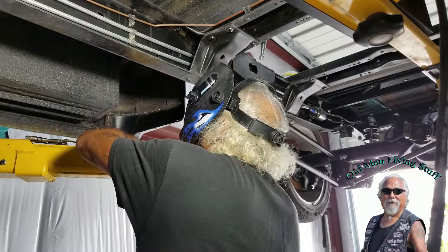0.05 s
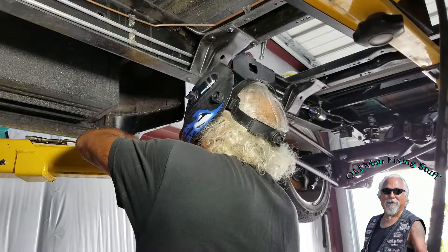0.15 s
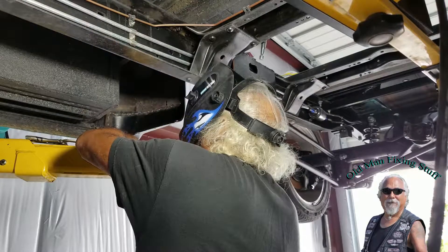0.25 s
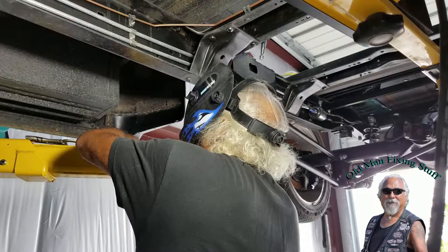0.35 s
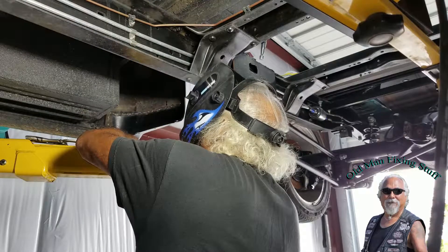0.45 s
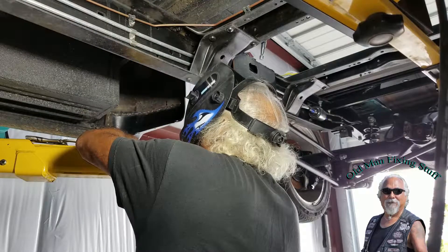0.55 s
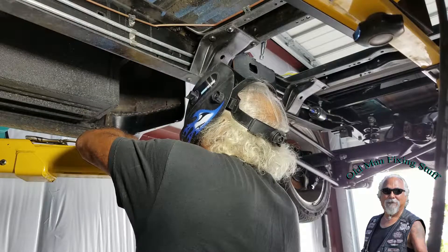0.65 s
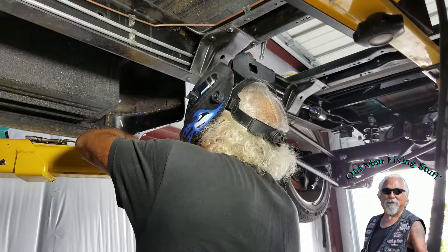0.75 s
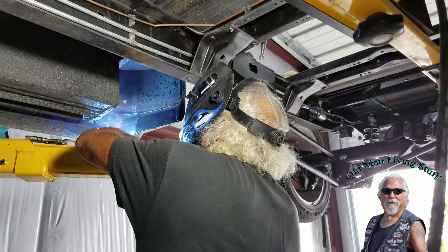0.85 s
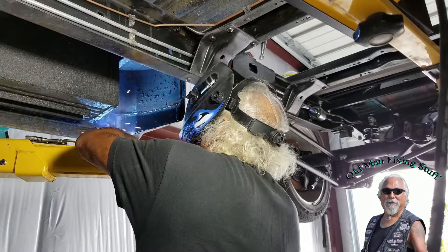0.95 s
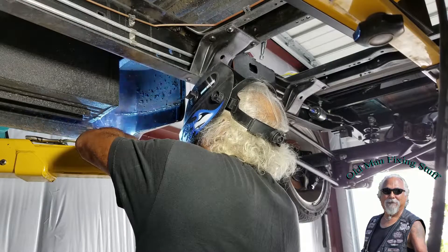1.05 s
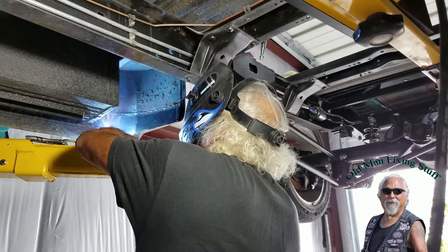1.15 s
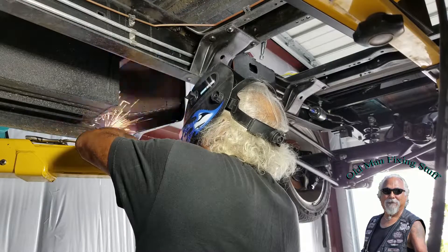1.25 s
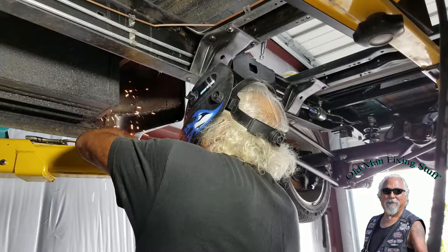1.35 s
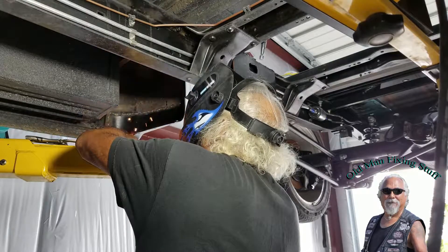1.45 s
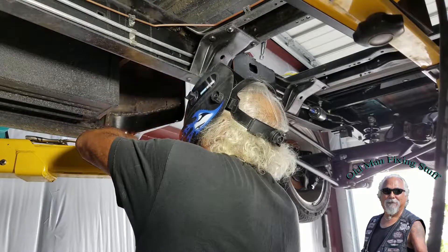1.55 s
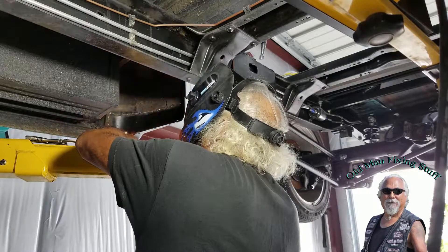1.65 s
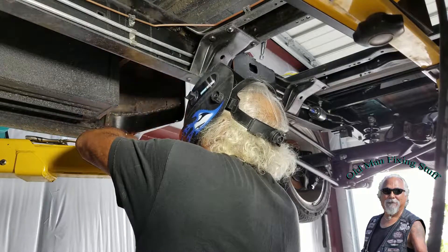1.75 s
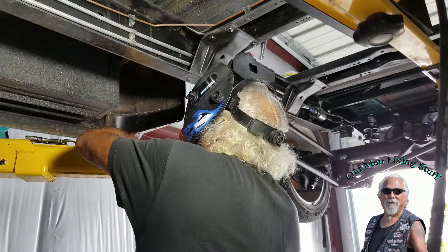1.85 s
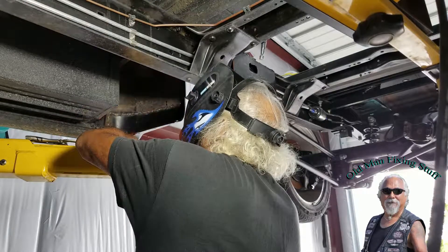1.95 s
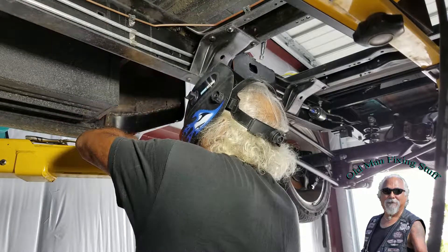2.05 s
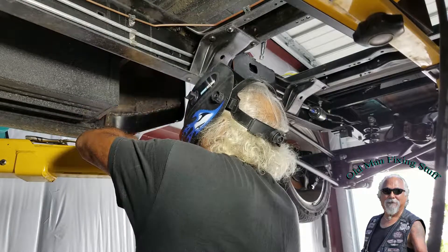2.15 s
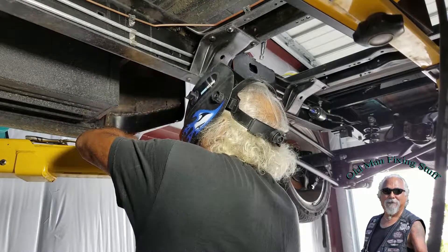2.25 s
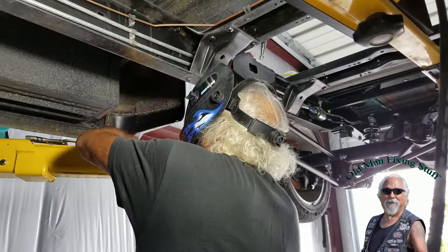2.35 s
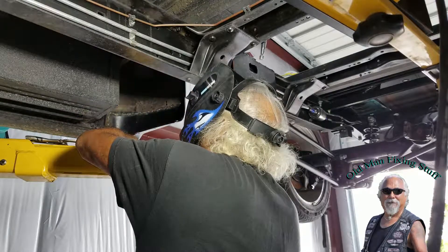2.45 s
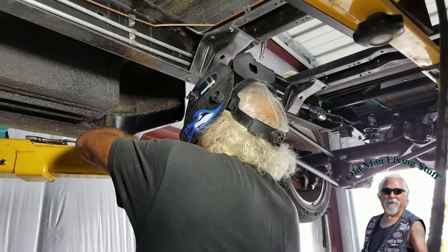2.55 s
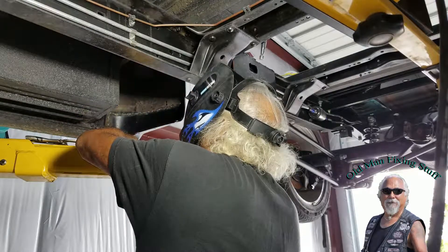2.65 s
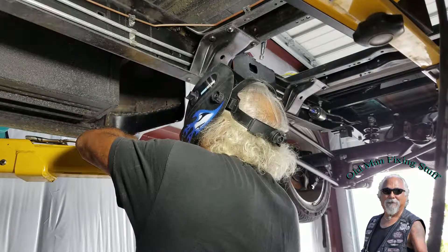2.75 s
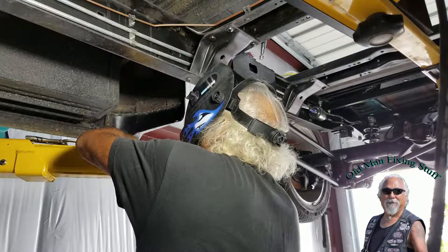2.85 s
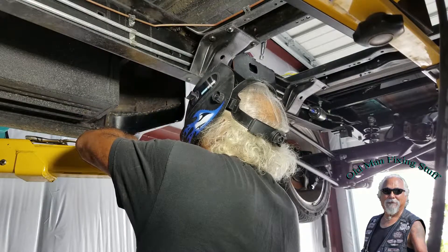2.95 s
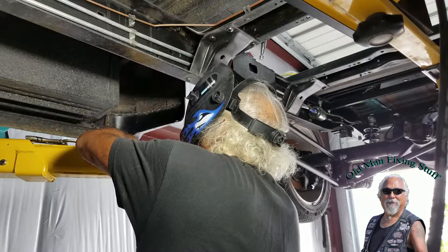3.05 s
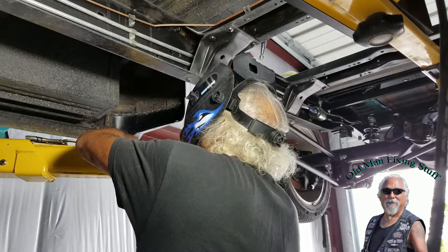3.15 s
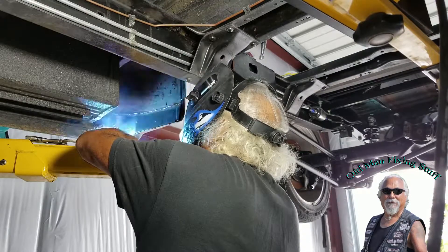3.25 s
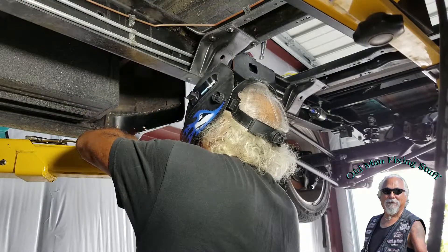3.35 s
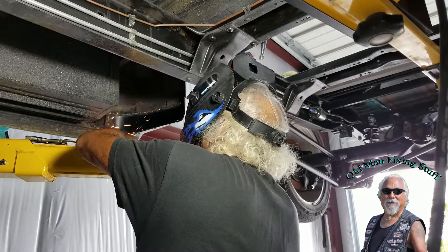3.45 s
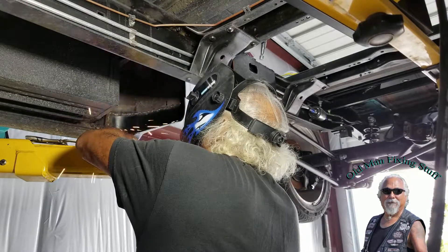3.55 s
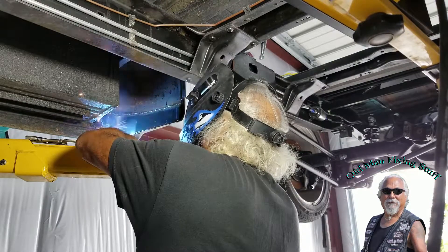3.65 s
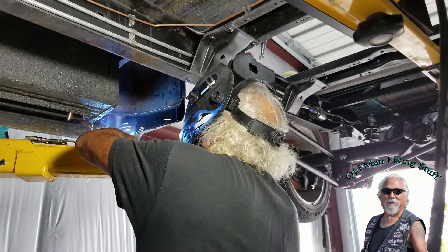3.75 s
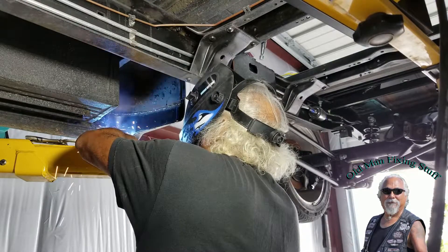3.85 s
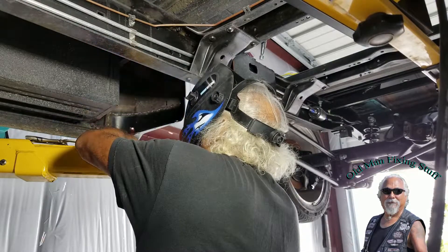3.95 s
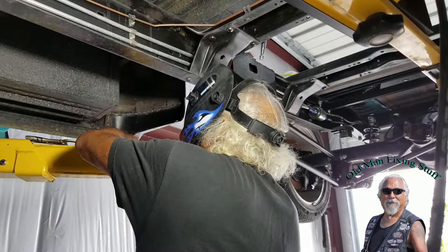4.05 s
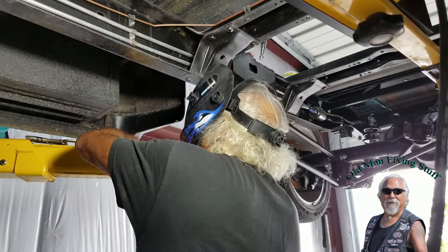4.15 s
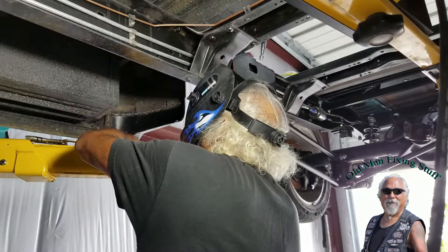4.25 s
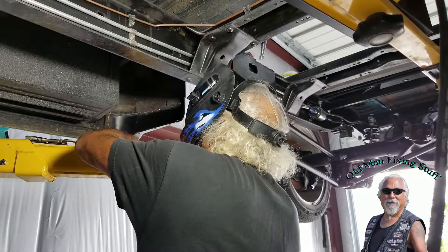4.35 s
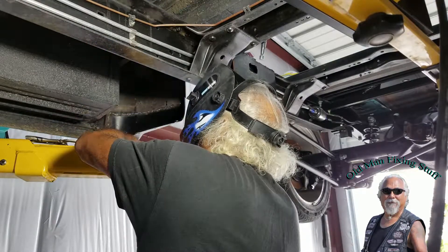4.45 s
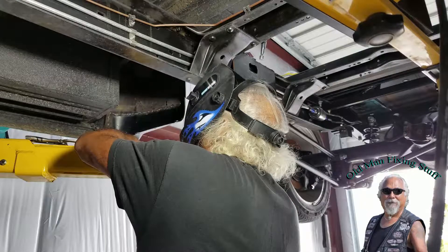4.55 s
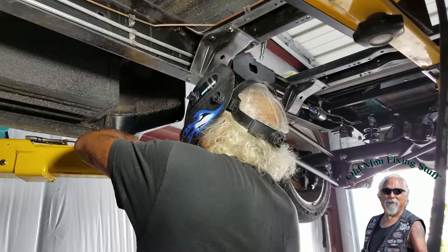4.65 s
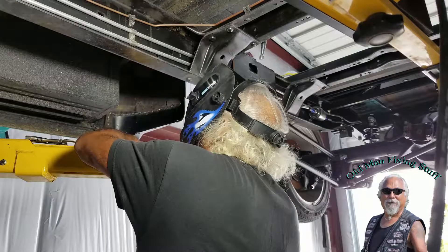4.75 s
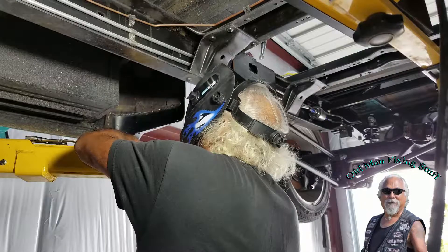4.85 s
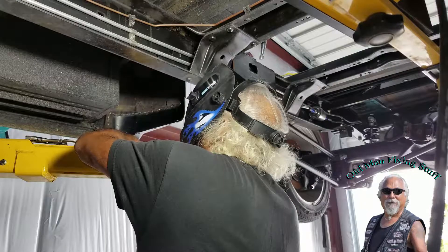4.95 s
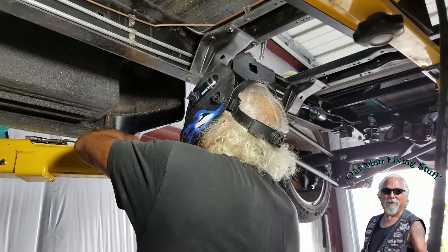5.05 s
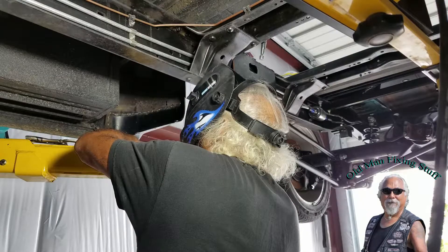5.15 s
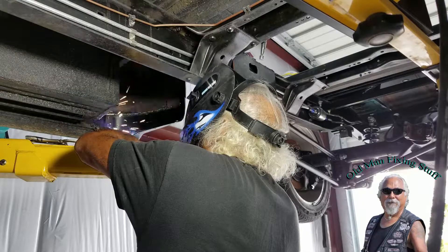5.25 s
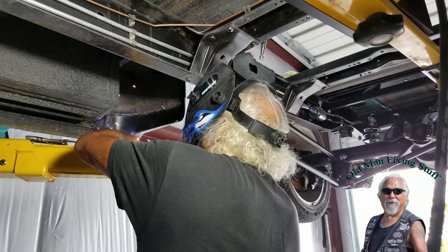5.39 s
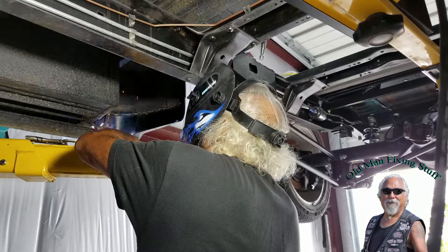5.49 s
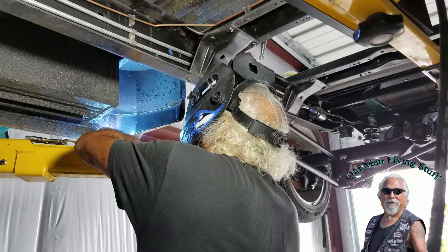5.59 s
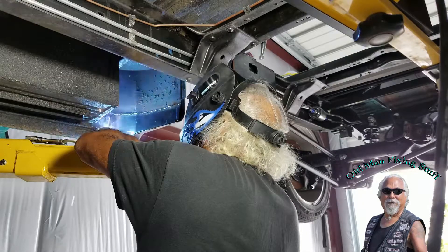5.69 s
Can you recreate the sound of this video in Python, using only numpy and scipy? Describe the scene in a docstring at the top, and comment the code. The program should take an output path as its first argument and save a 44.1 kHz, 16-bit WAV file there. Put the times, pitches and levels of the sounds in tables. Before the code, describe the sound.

In a workshop, beneath a raised car, a welding machine's cooling fan runs quietly: rushing air with a wavering midrange hum that rises and falls in level. At about 0.55 s a relay clicks; from 0.65 s sharp, irregular arc pops and a hissing spray of metal burst out, followed by a dense crackle of roughly 65 snaps a second from 1.0 to 1.2 s, and two last pops. A very faint click follows at 1.7 s, then only the fan. The second weld sputters from 3.2 s with loud snaps and crackles steadily from 3.7 to 3.85 s; a light touch and a dull panel bump follow at 3.9 s. A faint click comes at 4.35 s, a clearer one at 5.1 s. The third weld snaps hard at 5.2 s, stutters, and ends in two tiny crackles around 5.6 and 5.7 s. The close, bright snaps ring in the car's hollow and the room.

```python
"""First a welding machine's fan hums, then a relay clicks and a wire-feed welder starts under a car, in a workshop.
Three short tack welds stutter, then crackle: each short circuit of the wire is a spike with a brief noise sizzle.
Noise volleys make the metal sprays; the car's hollow and the room ring with the arc.
Relay clicks (shaped noise) come before or after a weld; a light touch and a bump ring a panel (fading sines).
The fan is coloured noise for its air and wavering sines for its hum; this background is heard louder and softer."""
import sys
import numpy as np
from scipy import signal
from scipy.fft import rfft, irfft
from scipy.io import wavfile
from scipy.ndimage import uniform_filter1d

SR = 44100
rng = np.random.default_rng(int(sys.argv[2]) if len(sys.argv) > 2 else 0)


def put_to_file(sound):
    """Save the sound as 16-bit audio at rate SR, in the file named by the first command-line argument."""
    columns = np.atleast_2d(sound).T  # one column per channel
    safe = np.clip(columns, -1, 1)
    whole_steps = np.round(safe * 32767)
    wavfile.write(sys.argv[1], SR, whole_steps.astype(np.int16))


N = 252252
TIME = np.arange(N) / SR

# Levels in the tables are relative: later gains and filters act on them too.
# single loud pops of the arc: (t/s, level/dB, brightness/dB per octave)
SNAPS = [(0.6579, 0, 0), (0.768, 0, 0.8), (0.8314, -8.5, 1.2), (0.839, -8.5, -2.5), (0.8804, -4.5, 0),
         (0.9089, -5.5, 0.3), (0.9465, -9.5, 0.7), (1.2403, -5, 2.3), (1.256, -9, 1.3), (3.2278, -3, -1),
         (3.391, -0.5, 0), (3.401, -1.5, -1.5), (3.4909, 2.5, -0.5), (3.566, 1.5, -0.2),
         (3.6393, -3.5, 0.1), (3.6578, 1.5, -1.3), (5.1946, -22, -1), (5.2136, 1.5, 1),
         (5.3088, -0.5, -0.1), (5.446, -6.5, -0.1)]
# stretches where the arc holds and crackles:
# (start t/s, end t/s, short circuits per s, opening level/dB, opening brightness/dB per octave)
CRACKLES = [(1.0107, 1.2203, 66, -8.7, -1.26), (3.6898, 3.839, 60, -5.5, -1.0),
            (5.5806, 5.632, 59, -7.5, -1), (5.675, 5.7124, 60, -13.5, -0.5)]
# sprays of molten metal when the wire burns back: (t/s, level/dB, brightness/dB per octave)
SPRAYS = [(0.657, -18, 1.5), (0.769, -27, .7), (3.224, -22, -2), (3.388, -28, -3), (3.491, -22, -1),
          (3.566, -22.5, -2), (5.213, -15.5, 1), (5.307, -30, 1.5)]
# colour of the whole arc: (f/Hz, level/dB)
ARC_COLOUR = [(25, -30), (70, -13), (150, 2.5), (650, -2.5), (1100, -2), (1850, 3), (2700, 3.5), (4200, 7),
              (6500, 3), (9000, 7.5), (12000, 2), (15500, -4)]
# colour of the metal sprays: (f/Hz, level/dB)
SPRAY_COLOUR = [(30, 12), (100, -1), (280, -4.5), (480, 0), (800, -2), (1500, -3.5), (3700, -5),
                (6200, 3.5), (9000, -6), (16000, -12)]
# air resonances of the hollow around the arc: (f/Hz, width/Hz, level/dB)
HOLLOW = [(287, 240, 10), (883, 310, 9.5), (1133, 365, 8.5), (1315, 60, 7.5), (1537, 130, 7),
          (2290, 300, 6), (3280, 390, 3), (3560, 364, 11.5), (4010, 270, 3), (4695, 130, 8),
          (4920, 76, -2.5), (5610, 160, 5.5), (7250, 97, 11.5), (7505, 72, 9.5), (8740, 133, 11.5),
          (9400, 410, 5), (10180, 110, -4)]
# echoes off the nearest panels and the floor, flipped where they turn at an open edge: (delay/ms, gain)
ECHOES = [(.32, -0.29), (1.11, -0.18), (2.15, 0.13), (2.7, 0.39), (15.1, -0.1)]
# relay clicks: (t/s, level/dB, brightness/dB per octave)
RELAY = [(0.558, -28, 0), (1.690, -45, -5), (4.361, -38.5, -5), (5.109, -27, 0.5)]
# colour of the relay clicks: (f/Hz, level/dB)
CLICK_COLOUR = [(100, -23.5), (700, -14.5), (1400, 7), (1900, 3), (2800, -1.5), (4500, -0.5), (8000, -5),
                (16000, -29)]
# a light touch, then a dull bump on the car body: (t/s, level/dB)
BUMPS = [(3.892, -37), (3.943, -25)]
# what the bumped panel rings with: (f/Hz, time to fall 60 dB/s, level/dB)
PANEL = [(178, 0.12, -29), (347, 0.35, -11), (421, 0.052, 1), (460, 0.084, -7.5), (562, 0.22, -9.5),
         (642, 0.26, -16), (1240, 0.084, -13.5), (1530, .13, -22)]
# colour of the rattle after a bump: (f/Hz, level/dB)
RATTLE_COLOUR = [(60, -10), (150, -5), (500, 0), (850, -17), (1600, -12), (4000, -35), (10000, -50)]
# colour of the fan's rushing air: (f/Hz, level/dB)
FAN_AIR_COLOUR = [(30, -21.5), (70, -10), (160, -0.5), (230, 1), (430, 1.2), (650, -2.5), (860, -9),
                  (1040, -5), (1400, -10), (2600, -15.5), (4200, -15), (7000, -27.5), (10000, -39),
                  (16000, -60.5)]
# tones of the machine: (f/Hz, level/dB, waver/Hz)
HUM = [(222.4, -10, 9), (501.9, -3, 0.74), (668.5, -11.5, 7), (1026, -13.5, 9), (1720, -18.5, 8)]
# background level as heard: it dips after each weld and slowly recovers: (t/s, level/dB)
BACKGROUND_LEVEL = [(0.15, -49.5), (0.68, -39.5), (1.0, -48.5), (1.5, -51.5), (2.33, -46.5), (2.6, -40.5),
                    (3.34, -39.5), (4.1, -44), (4.72, -45.5), (5.07, -41), (5.55, -48)]
# workshop reverberation: (f/Hz, time to fall 60 dB/s, level/dB)
ROOM = [(125, 0.7, -11.5), (500, 0.65, -3.5), (2000, 0.22, 1.5), (3940, 0.88, -10.5), (6500, 0.51, -3),
        (10100, 0.46, -13.5), (15000, 0.25, -19)]

# random spread in a crackle: timing (share of a gap), level (dB), brightness (dB per octave)
CRACKLE_JITTER, CRACKLE_SCATTER_DB, CRACKLE_SCATTER_TILT = 0.14, 1.16, 0.9
# the snaps soften and thin out as the pool heats (dB per s, dB per octave per s)
SETTLE_DB_PER_S, THIN_TILT_PER_S = -7.5, 7
# snaps crowd together midway: their largest shift in time, as a share of the stretch
MIDWAY_HURRY = 0.03
# how long a spray of 0 dB holds; weaker ones are shorter in proportion
SPRAY_HOLD_S = 0.07
TOP_HZ = 16100  # nothing much is heard above this


def undb(db):
    """Decibels to gain."""
    return 10 ** (np.asarray(db) / 20)


def log_interp(hz, points, values):
    """Straight lines on a log-frequency axis."""
    return np.interp(np.log(np.maximum(hz, 1)), np.log(points), values)


def colour(x, spectrum, size=2048):
    """Filter with the given (Hz, dB) points, reacting as early as it can (minimum phase)."""
    bins = np.fft.rfftfreq(size, 1 / SR)
    level_db = log_interp(bins, *np.transpose(spectrum))
    # folding the cepstrum forward in time keeps the filter from ringing ahead of the sound
    cepstrum = irfft(np.log(undb(level_db)))
    cepstrum[1:size // 2] *= 2
    cepstrum[size // 2 + 1:] = 0
    response = irfft(np.exp(rfft(cepstrum)))
    return signal.fftconvolve(x, response)[:len(x)]


def tilt(x, db_per_octave, low_hz=600, high_hz=12000):
    """Brighten or dull a sound about the middle of its range."""
    db = db_per_octave * np.log2(high_hz / low_hz) / 2
    return colour(x, [(low_hz, -db), (high_hz, db)])


def unit(x):
    """Scale to rms 1."""
    return x / np.sqrt(np.mean(x ** 2))


def fade(t, t60):
    """Exponential decay by 60 dB in t60 seconds."""
    return np.exp(-np.log(1000) * t / t60)


def walk(rate):
    """Smooth random wander of rms near 1, with about `rate` new values per second."""
    k = int(SR / rate)
    steps = np.repeat(rng.standard_normal(N // k + 1), k)
    smooth = uniform_filter1d(uniform_filter1d(steps, k), k)
    return unit(smooth[:N])


def add(out, s, x):
    """Mix x in at time s."""
    part = out[int(round(s * SR)):][:len(x)]
    part += x[:len(part)]


def snaps(sizzle_db=-8, sizzle_t60=0.025, size=4096):
    """Each short circuit bursts the wire's tip: one pressure spike and a brief sizzle as the arc relights."""
    out, t = np.zeros(N), TIME[:size]
    for s, db, brightness in [*SNAPS, *crackle()]:
        sizzle = rng.standard_normal(size) * fade(t, sizzle_t60)
        sizzle = undb(sizzle_db) * sizzle / np.linalg.norm(sizzle)
        snap = sizzle - signal.unit_impulse(size)
        add(out, s, undb(db) * tilt(snap, brightness))
    return out


def crackle():
    """The feeding wire dips into the pool at a loose rate; one (s, dB, brightness) per short circuit."""
    for start, end, rate, db, brightness in CRACKLES:
        length = end - start
        chance = rng.standard_normal((32, 3))
        gaps = max(round(length * rate), 1)
        for k, (late, louder, brighter) in enumerate(chance[:gaps + 1]):
            jitter = (0 < k < gaps) * CRACKLE_JITTER * late  # the first and last stay put
            share = (k + jitter) / gaps
            age = length * (share + MIDWAY_HURRY * np.sin(2 * np.pi * share))
            level_db = db + SETTLE_DB_PER_S * age + CRACKLE_SCATTER_DB * louder
            snap_tilt = brightness + THIN_TILT_PER_S * age + CRACKLE_SCATTER_TILT * brighter
            yield start + age, level_db, snap_tilt


def sprays(grain_db=2.5, t60=0.17, size=8192):
    """Droplets burst in a dense volley that holds briefly and dies away."""
    out, t = np.zeros(N), TIME[:size]
    for s, db, brightness in SPRAYS:
        hold_s = SPRAY_HOLD_S * undb(db)
        grain = undb(grain_db * rng.exponential(size=size))  # a few samples stand out
        bursts = unit(rng.standard_normal(size) * grain)
        envelope = fade(np.maximum(t - hold_s, 0), t60)
        add(out, s, undb(db) * tilt(bursts, brightness) * envelope)
    return colour(out, SPRAY_COLOUR)


def hollow(x, scatter_db=-1.0, scatter_t60=0.072, build_s=0.0012, size=4096):
    """The car's underside: panel echoes coloured by its air resonances, plus scatter off the parts around."""
    t = TIME[:size]
    echoes = signal.unit_impulse(size)  # the direct sound
    for ms, gain in ECHOES:
        echoes[int(ms * SR / 1000)] += gain
    bins = np.fft.rfftfreq(size, 1 / SR)[1:]
    resonance_db = sum(db / (1 + (2 * (bins - hz) / width) ** 2) for hz, width, db in HOLLOW)
    scatter = rng.standard_normal(size) * fade(t, scatter_t60) * (1 - np.exp(-t / build_s))
    scatter = undb(scatter_db) * scatter / np.linalg.norm(scatter)
    response = colour(echoes, np.column_stack([bins, resonance_db])) + scatter
    return signal.fftconvolve(x, response)[:N]


def ribs(x, bounce=0.9):
    """Ribs and seams smear a spike over a few ms without colouring it: two all-passes."""
    g = np.clip(bounce, 0, 0.95)
    for lag in (6, 17):  # samples
        delayed = signal.unit_impulse(lag + 1, lag)
        direct = signal.unit_impulse(lag + 1)
        x = signal.lfilter(g * direct + delayed, direct + g * delayed, x)
    return x


def relay(chatter_s=0.0045, t60=0.16, size=8192):
    """The contacts chatter and rattle the machine's case: noise that holds briefly, then fades."""
    out, t = np.zeros(N), TIME[:size]
    for s, db, brightness in RELAY:
        rattle = rng.standard_normal(size) * fade(np.maximum(t - chatter_s, 0), t60)
        add(out, s, undb(db) * tilt(rattle, brightness))
    return colour(out, CLICK_COLOUR)


def bumps(rattle_db=-10, rattle_t60=0.24, low_hz=140, size=16384):
    """A soft blow rings the panel's own tones, with a dull rattle."""
    out, t = np.zeros(N), TIME[:size]
    ring = sum(undb(db) * fade(t, t60) * np.sin(2 * np.pi * hz * t) for hz, t60, db in PANEL)
    for s, db in BUMPS:
        rattle = unit(colour(rng.standard_normal(size), RATTLE_COLOUR)) * fade(t, rattle_t60)
        add(out, s, undb(db) * (ring + undb(rattle_db) * rattle))
    # a thin panel radiates little bass
    return signal.sosfilt(signal.butter(2, low_hz, "highpass", fs=SR, output="sos"), out)


def workshop(x):
    """Diffuse room tail: noise in overlapping bands, each fading at its own speed."""
    t = TIME[:SR]
    hz, t60, level_db = np.transpose(ROOM)
    noise, bins = rfft(rng.standard_normal(SR)), np.fft.rfftfreq(SR, 1 / SR)
    tail = np.zeros(SR)
    for share, decay, db in zip(np.eye(len(hz)), t60, level_db):
        band = irfft(noise * log_interp(bins, hz, share))
        evened = np.sqrt(decay * SR / (2 * np.log(1000)))  # so a long fade adds no energy
        tail += band * undb(db) * fade(t, decay) / evened
    build_up = 1 - np.exp(-t / 0.016)
    return signal.fftconvolve(x, tail * build_up)[:N]


def fan(air_db=-1, hum_db=-3, flutter_db=1.4, waver_db=0.3):
    """Rushing air and wavering blade tones of the welder's cooling fan, at the background level as heard."""
    air = unit(colour(rng.standard_normal(N), FAN_AIR_COLOUR)) * undb(flutter_db * walk(14))
    tones = np.zeros(N)
    for hz, db, waver in HUM:
        gain = undb(db + waver_db * walk(5.4)) * np.sqrt(2)
        phase = 2 * np.pi * np.cumsum(hz + waver * walk(25)) / SR
        tones += gain * np.sin(phase)
    heard_gain = undb(np.interp(TIME, *np.transpose(BACKGROUND_LEVEL)))
    return (undb(air_db) * air + undb(hum_db) * tones) * heard_gain


def scene(snap_db=0.42, spray_db=-8.0, handling_room_db=-3):
    """The arc is heard through the hollow, while the room gets it from all sides; the fan runs beneath."""
    arc = colour(undb(snap_db) * snaps() + undb(spray_db) * sprays(), ARC_COLOUR)
    handling = relay() + bumps()
    room = workshop(arc + undb(handling_room_db) * handling)
    return (ribs(hollow(arc)) + handling + room + fan())[None]


def record(dry, drive=0.69):
    """The microphone rounds the loudest snaps; the top is cut."""
    rounded = np.tanh(drive * dry) / drive
    return signal.sosfilt(signal.ellip(10, 0.2, 75, TOP_HZ, fs=SR, output="sos"), rounded)


dry = scene()
out = record(dry)
put_to_file(out)
```